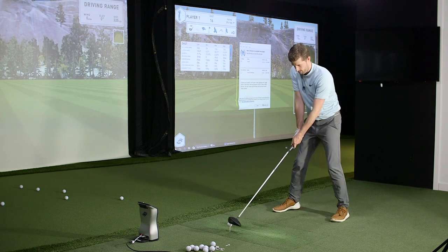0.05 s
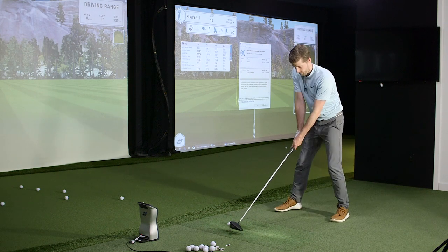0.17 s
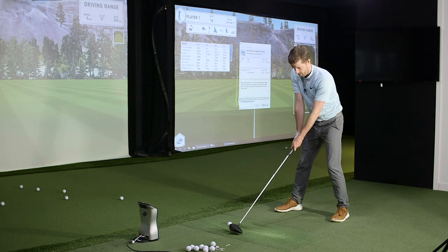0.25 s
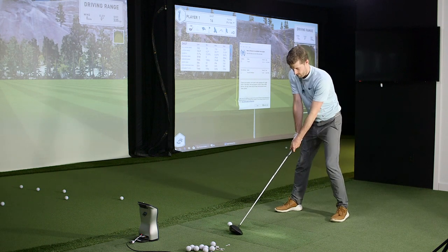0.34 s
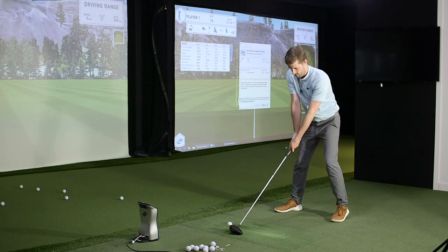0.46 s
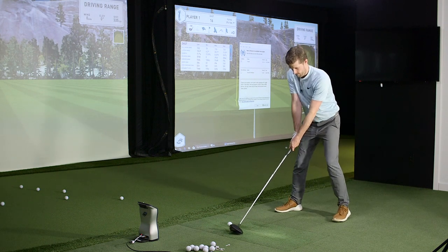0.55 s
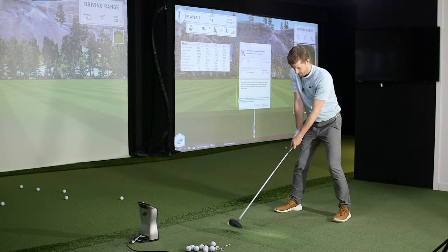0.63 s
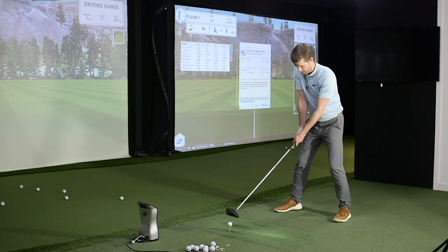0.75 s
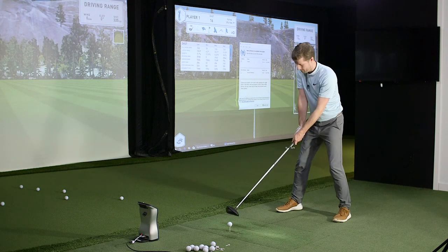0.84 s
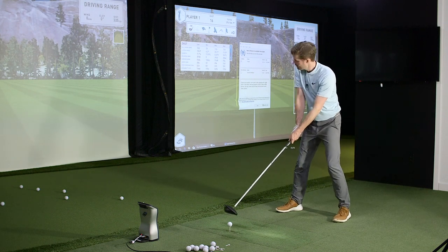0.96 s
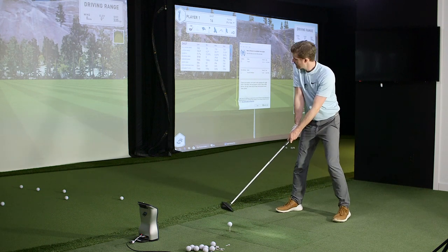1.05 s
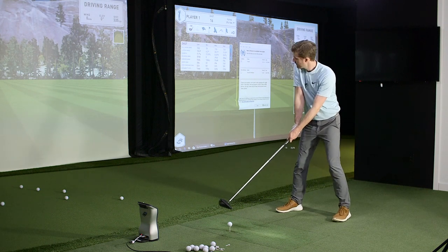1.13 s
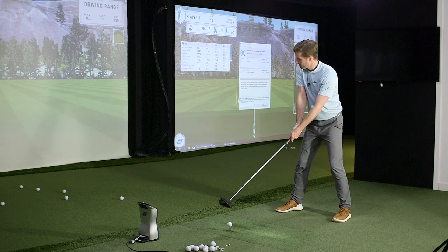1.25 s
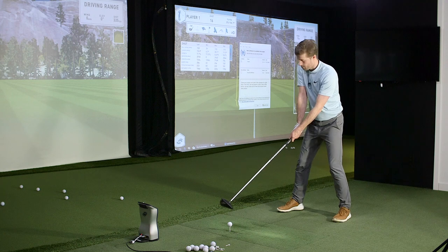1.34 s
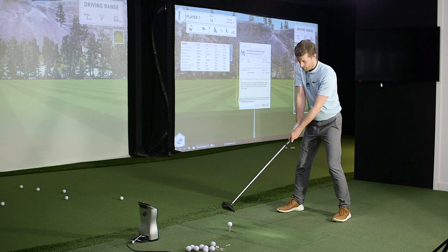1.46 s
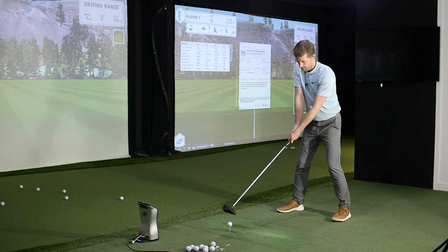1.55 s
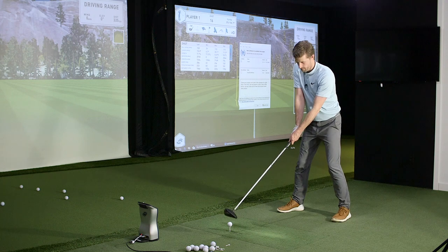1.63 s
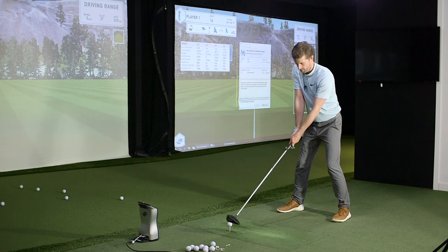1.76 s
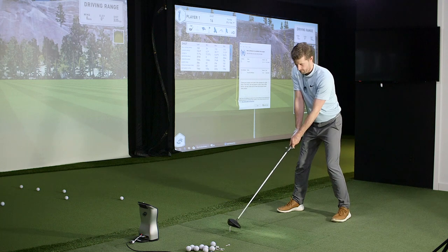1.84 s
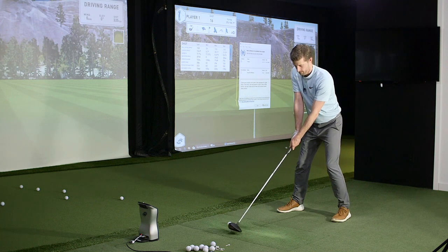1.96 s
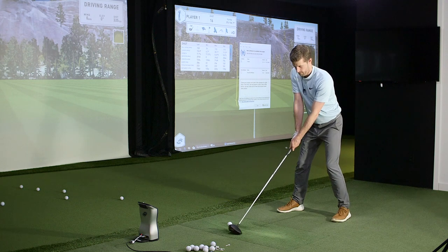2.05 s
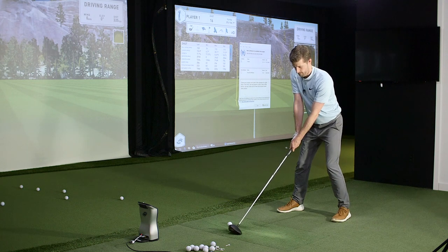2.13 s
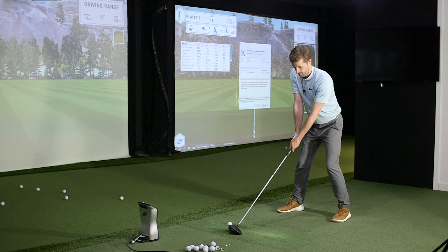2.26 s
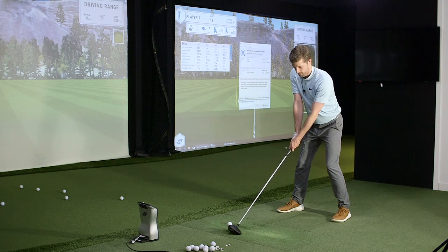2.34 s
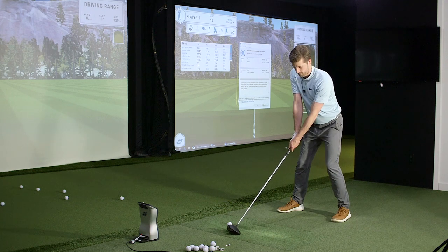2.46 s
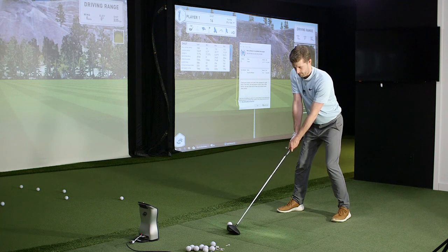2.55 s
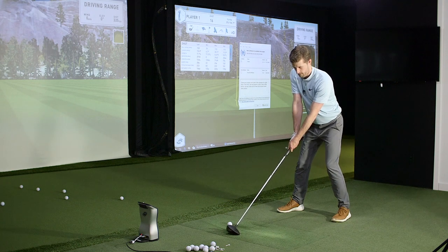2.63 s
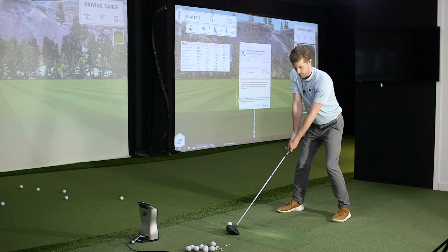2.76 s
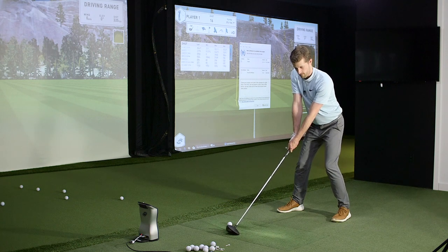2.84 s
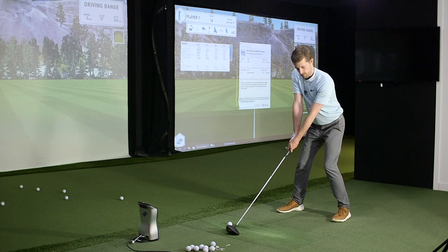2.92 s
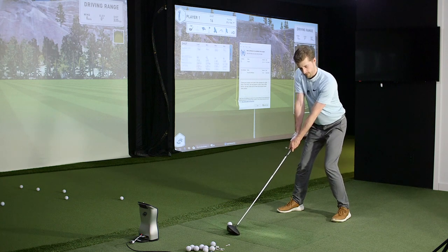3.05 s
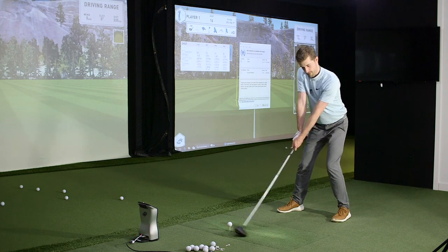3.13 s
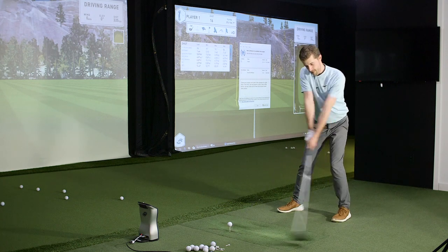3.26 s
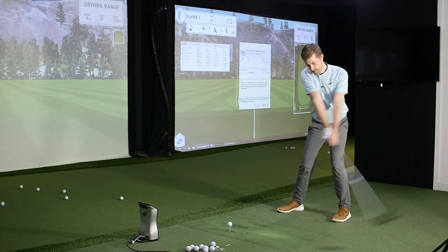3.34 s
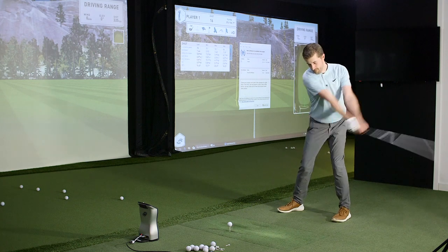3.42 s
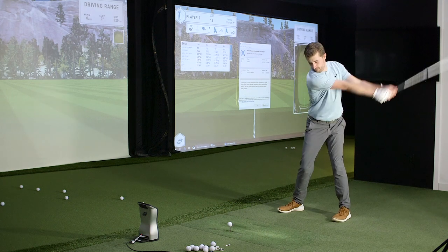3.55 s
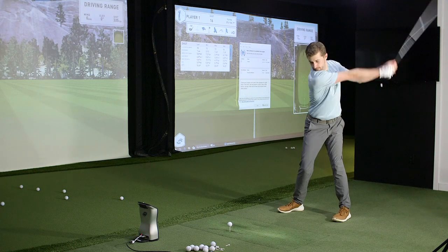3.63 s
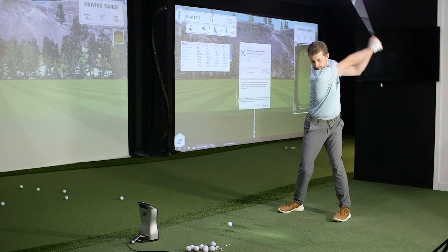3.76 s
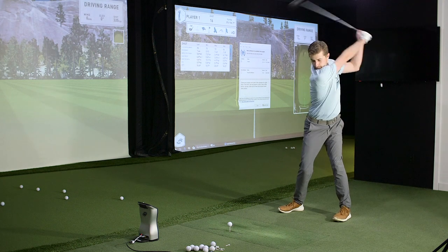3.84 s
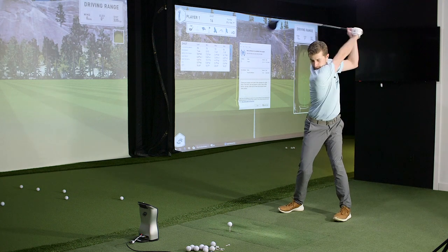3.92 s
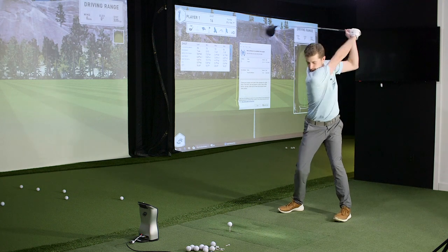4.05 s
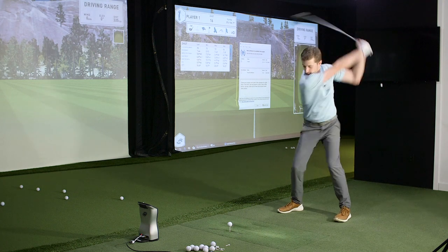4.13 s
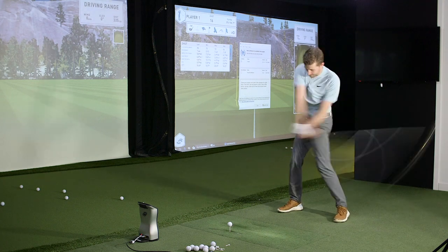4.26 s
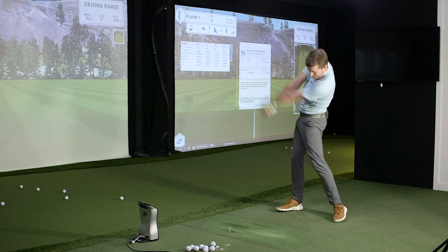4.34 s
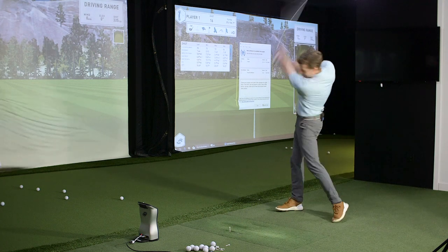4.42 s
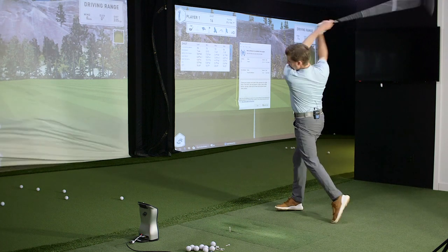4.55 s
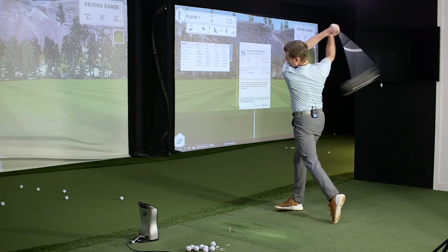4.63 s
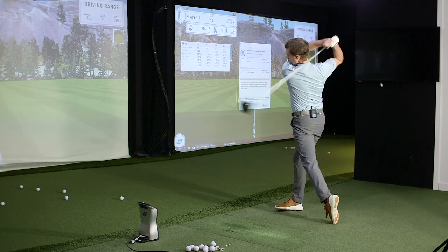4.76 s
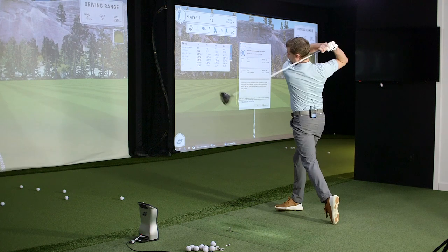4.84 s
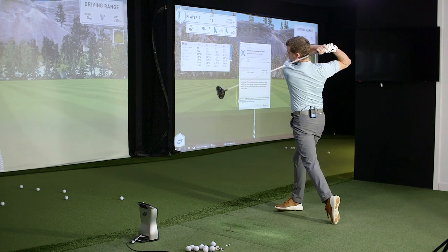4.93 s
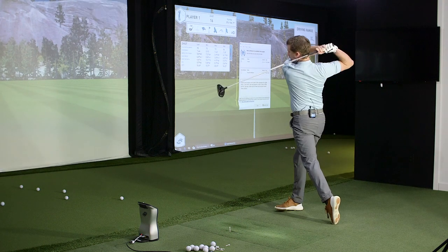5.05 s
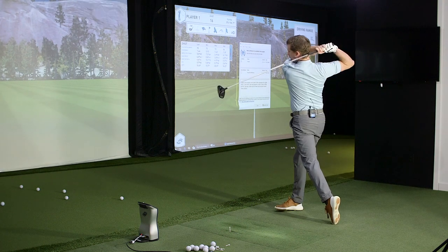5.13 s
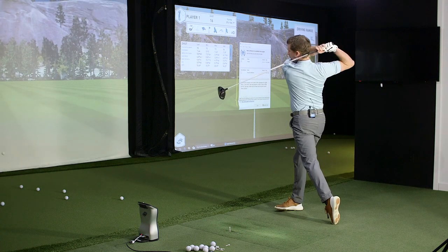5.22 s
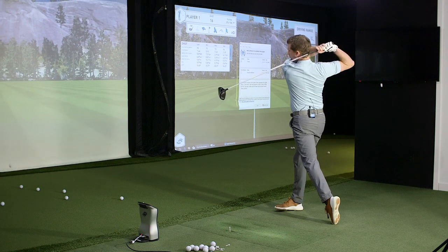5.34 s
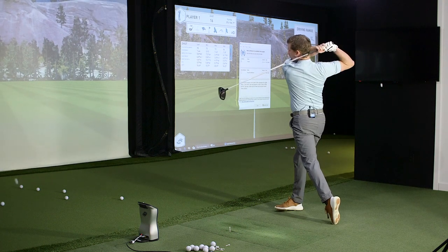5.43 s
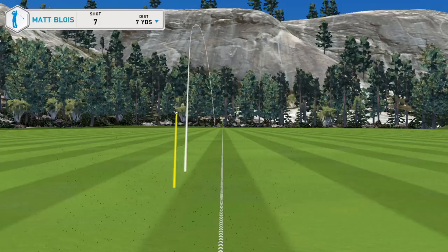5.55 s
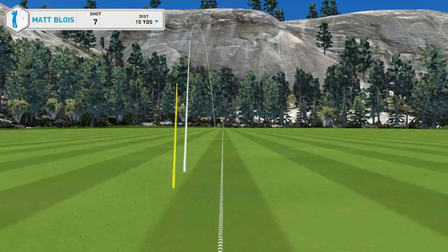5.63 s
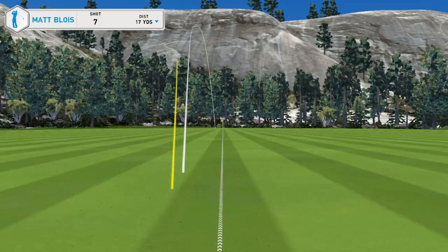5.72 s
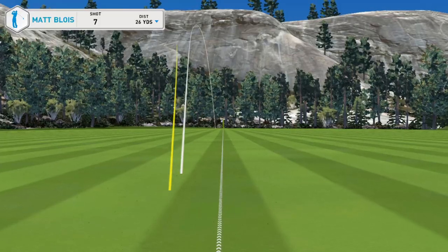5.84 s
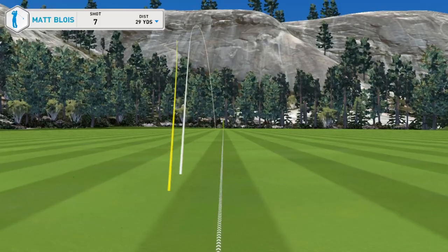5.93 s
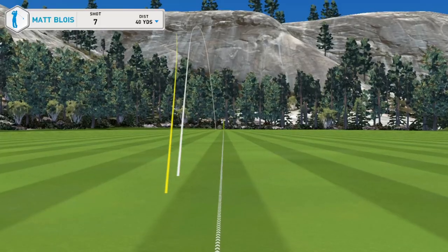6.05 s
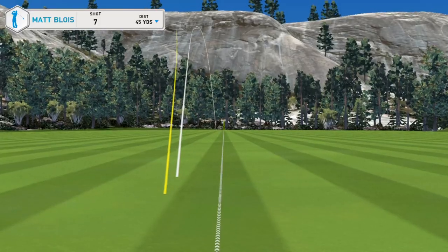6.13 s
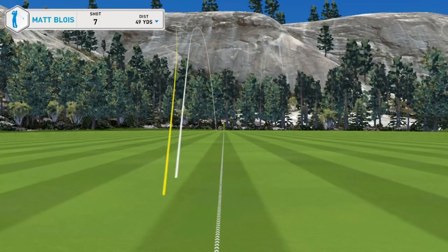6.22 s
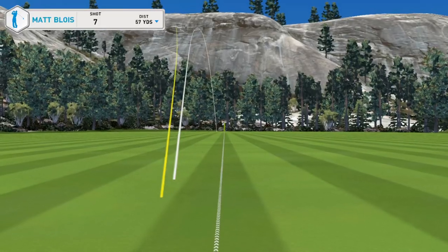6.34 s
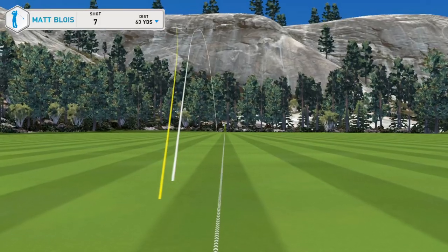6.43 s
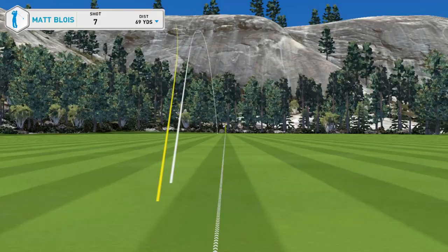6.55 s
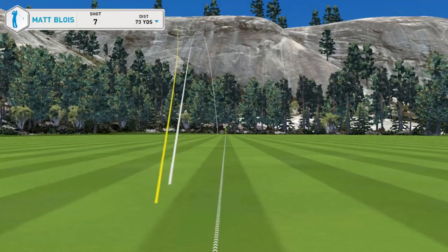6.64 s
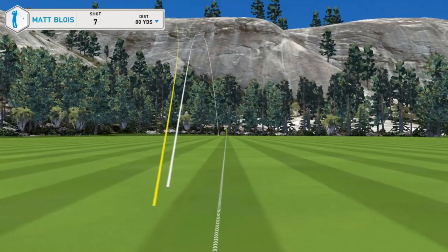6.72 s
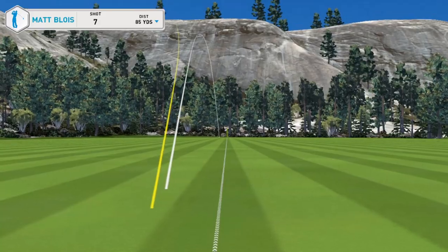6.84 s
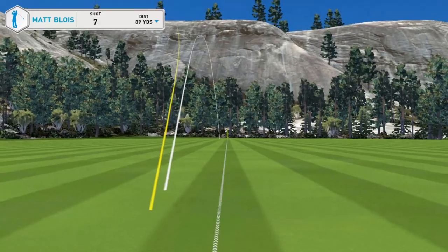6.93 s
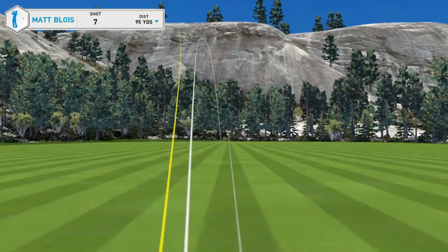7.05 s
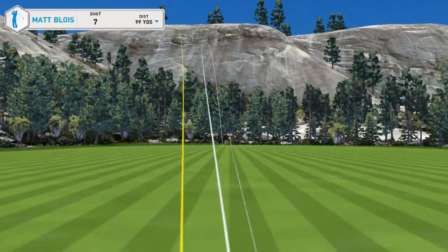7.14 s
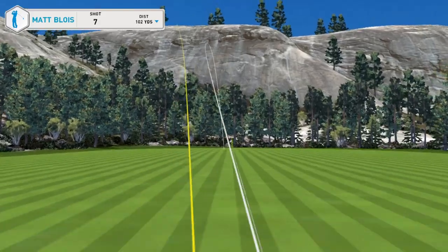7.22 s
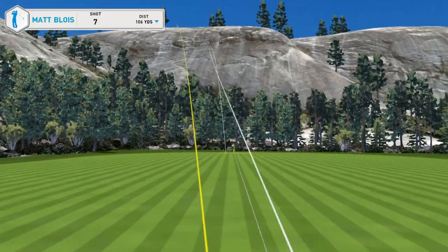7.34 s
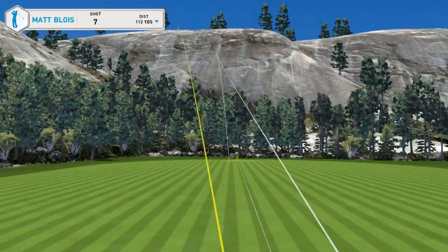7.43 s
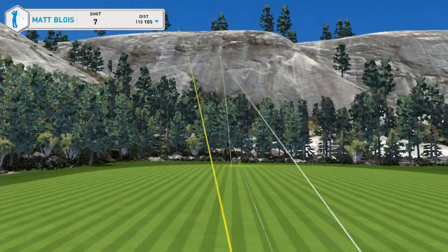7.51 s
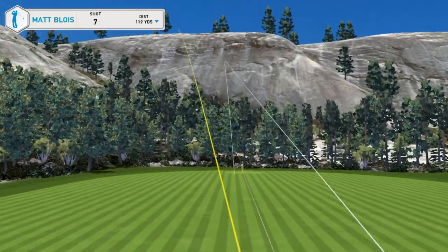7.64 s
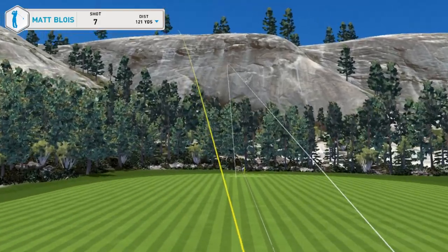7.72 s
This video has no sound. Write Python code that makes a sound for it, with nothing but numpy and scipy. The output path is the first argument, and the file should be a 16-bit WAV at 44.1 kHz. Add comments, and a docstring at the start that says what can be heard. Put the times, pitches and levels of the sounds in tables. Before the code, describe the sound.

Machine hum throbs under soft shuffling; a swift swing whoosh ends in a loud, distorted golf-ball crack, a screen thud and ringing room, then a small close crackle.

```python
"""Golf drive in an indoor bay

One clip-on microphone that overloads; a golfer drives a ball into a hanging screen.
Throughout, two machines hum a few hertz apart as beating sines, over fan tones and duct air of filtered noise.
Cloth and shoes rustle as swelling grains of noise; ticks, a knock and a late crackle sit close to the microphone.
The shaft whooshes as noise in a moving band, and the hollow head cracks the ball as ringing modes.
The ball booms into the screen, and the bay rings out as noise decaying band by band."""
import sys
import numpy as np
from scipy import signal
from scipy.fft import rfft, irfft, next_fast_len
from scipy.io import wavfile

SR = 44100
rng = np.random.default_rng(int(sys.argv[2]) if len(sys.argv) > 2 else 0)


def store_pcm(level_fs):
    """Save levels as 16-bit WAV."""
    pcm = np.round(np.clip(level_fs, -1, 1) * 32767).astype(np.int16)
    wavfile.write(sys.argv[1], SR, np.atleast_2d(pcm).T)


N = 343098
TIME = np.arange(N) / SR

# Levels are those ahead of the microphone input; "relative" ones are scaled where they are used.
# Hum of two motors: [f/Hz, rms level/dB]
MOTOR_HUM = [(53.93, -48), (59.05, -50)]
# Overtones of the hum: [multiple of first motor, multiple of second motor, rms level/dB]
HUM_OVERTONES = [(2, 0, -58), (1, 1, -68.5), (0, 2, -63), (3, 0, -61.5)]
# A fan's blade tone, drifting slightly in pitch: [t/s, f/Hz, rms level/dB]
BLADE_DRIFT = [(0, 522.7, -63), (3.3, 525.3, -64.5), (3.7, 523.7, -58.5), (7.78, 523.4, -61)]
# Wavering fan tones: [f/Hz, bandwidth/Hz, rms level/dB]
WAVERING_TONES = [(108.55, 27, -51.5), (265, 1.3, -64), (537, 3, -67.5), (794, 2.9, -68.5),
                  (1028, 3.5, -71), (1520, 1.4, -72.5)]
# Air of fans and ducts: [f/Hz, relative level/dB per Hz]
DUCT_COLOUR = [(15, -49), (30, -29), (42, -20.5), (59, -22.5), (82, -24.5), (114, -11), (134, -16.5),
               (280, -16.5), (489, -20), (817, -26), (1560, -31.5), (2160, -39.5), (4500, -46), (7000, -52),
               (16000, -54)]

# Separate shirt rustles, rise and fall spanning 20 dB: [peak t/s, peak level/dB, rise/s, fall/s, treble lift/dB]
SHIRT_RUSTLES = [(.02, -72, .1, .2, -1), (.25, -75, .05, .06, 3), (.66, -69, 0.081, .12, -3),
                 (.885, -57.5, 0.083, 0.11, 0.5), (.96, -67, .08, .05, 5), (1.43, -74, .05, .12, 6),
                 (2.99, -75, .06, .15, 4), (3.28, -66, 0.092, .1, 1), (4.17, -79, .03, .04, 2),
                 (4.354, -40.5, .018, .045, -10), (4.84, -58, .07, .06, 0), (5.05, -64, .06, .1, 0),
                 (5.635, -62, .03, .07, -12), (5.98, -75, .04, .05, 0), (7.0, -68, .1, 0.82, 3)]
# Shirt stretching through the backswing: [t/s, level/dB]
SHIRT_STRETCH = [(3.35, -78), (3.55, -65), (3.73, -59), (3.79, -61), (3.84, -66), (4.01, -64), (4.12, -74),
                 (4.28, -69), (4.33, -70)]
# Colour of sliding cloth: [f/Hz, relative level/dB per Hz]
CLOTH_COLOUR = [(1500, -7.5), (2800, -1), (4200, -3.5), (7000, -4.5), (10000, -3.5), (13600, -3),
                (16000, -13)]
# Feet shifting on the turf: [peak t/s, peak level/dB]
SHOE_SCUFFS = [(.07, -57), (.35, -72), (.54, -60), (.8, -59.5), (1.04, -60.5), (1.17, -66), (1.32, -61),
               (1.53, -58.5), (1.63, -63), (1.7, -63), (1.8, -65), (1.92, -73)]
# Colour of shoes on turf: [f/Hz, relative level/dB per Hz]
TURF_COLOUR = [(600, 9.0), (1500, 14.5), (2600, 2), (3600, 1.5), (5000, -11.0), (9000, -66)]
# Small ticks near the microphone: [t/s, peak level/dB, f/Hz, ring/cycles]
CLOSE_TICKS = [(.38, -45, 2000, 2.8), (0.499, -43, 2530, 2.5), (0.81, -29, 11000, 2.6),
               (1.325, -48, 2200, 2.5), (1.535, -42, 1400, 5.3), (1.591, -47, 3000, 2.2),
               (1.65, -52, 1800, 3), (1.758, -50, 10000, 2.5), (1.886, -47, 9000, 1.5),
               (2.26, -52, 11000, 2.5), (3.39, -50, 8500, 4), (3.864, -38, 1216, 1.3),
               (5.627, -47, 3000, 1.9), (6.8375, -34, 11500, 4), (6.856, -25, 9000, 1.8),
               (6.8608, -22, 6500, 1.5), (6.864, -31, 9500, 1.5), (6.8707, -11.5, 8650, 1),
               (6.8712, -7, 11500, 1.5), (6.875, -32, 5000, 1.5), (6.8772, -24, 11500, 1.8),
               (6.899, -29, 4500, 1.5), (6.904, -35, 1500, 1.1)]
# What the knock at the top of the backswing rings with: [f/Hz, level/dB, t60/s]
KNOCK_MODES = [(740, -23, 0.0047), (1150, -28, 0.0062), (2140, -28.5, 0.0062), (4700, -41, 0.0071),
               (14500, -28, 0.0027)]

# Downswing: [t/s, f/Hz of air shed by the shaft, whoosh level/dB, low rush level/dB, hiss level/dB]
DOWNSWING = [(4.25, 300, -79, -52, -90), (4.3, 346, -68, -42.5, -75), (4.36, 423, -58, -33, -62),
             (4.395, 560, -58, -32.5, -64), (4.41, 696, -34, -37, -56.5), (4.43, 850, -24.5, -33, -44),
             (4.45, 1000, -18.5, -27, -36), (4.468, 1103, -28.5, -21.5, -37),
             (4.49, 1107, -33.5, -44.5, -49.5), (4.52, 988.4, -72, -74, -79)]
# Air pushed by the club head: [f/Hz, relative level/dB per Hz]
RUSH_COLOUR = [(20, -11), (50, -6), (110, -4.0), (250, -20), (600, -26.5), (3000, -44.5)]
# Hiss of the club head: [f/Hz, relative level/dB per Hz]
HISS_COLOUR = [(1500, -8), (3000, -2.5), (6000, -5.5), (10000, -1.5), (16000, -3.5)]

# Ball squashed on the face: [f/Hz, relative level/dB per Hz]
CRACK_COLOUR = [(40, -4.5), (100, -7.5), (250, -2.5), (500, 0.5), (800, -0.5), (1300, -6.5), (2000, -5),
                (3000, -12), (4000, -6.5), (5000, -6), (8000, -5), (12000, -6.5), (16000, -12.5)]
# Nearly even blow that sets the head ringing: [f/Hz, relative level/dB per Hz]
BLOW_COLOUR = [(40, 0.00046), (16000, 0.0003)]
# Modes of the hollow club head: [f/Hz, relative level/dB, t60/s]
HEAD_MODES = [(3950, -4, .009), (3997, -0.5, .010), (4420, -4, .006), (5200, -7.5, .005),
              (5750, -2.5, .007), (6280, -2, 0.0087), (6250, -9.5, 0.0033), (8600, -8.5, .003),
              (10000, -9.5, .003)]
# Snap of the strike: [f/Hz, relative level/dB per Hz]
SNAP_COLOUR = [(300, -3.5), (1200, 1), (3000, -10.5), (16000, -23.5)]
# Air of the strike reaching the microphone: [f/Hz, relative level/dB, t60/s]
PUFF_MODES = [(35, -0.5, .1), (72, -3, 0.12), (136, 1, 0.027), (260, -8.5, .02)]
# Modes of the screen and the air behind it: [f/Hz, relative level/dB, t60/s]
SCREEN_MODES = [(106.7, -10.5, .3), (142.5, -13.5, 0.16), (175.7, -9.5, 0.11), (209, -7.5, 0.072),
                (314, -20.5, 0.11), (439, -7.5, 0.092), (584, -15, 0.052)]
# Cloth of the screen whipped back: [f/Hz, relative level/dB per Hz]
SLAP_COLOUR = [(40, -46), (70, -16), (100, 7), (160, 9.5), (210, 1.5), (280, -3.5), (420, -6), (600, -17),
               (900, -22), (1500, -19.5), (4000, -44)]
# Decay of the bay: [f/Hz, t60/s]
BAY_DECAY = [(60, .9), (120, .85), (250, .75), (500, 1.0), (1000, 1.1), (2000, .92), (4000, .88),
             (6000, .72), (8000, .54), (11000, .38), (16000, .26)]

# Short close crackle in four bursts: [peak t/s, peak level/dB, rise/s, fall/s]
CRACKLE_BURSTS = [(6.851, -54, .004, .006), (6.862, -33, 0.0086, 0.008), (6.877, -31.5, 0.01, 0.024),
                  (6.9, -44.5, 0.023, 0.049)]
# Colour of the crackle: [f/Hz, relative level/dB per Hz]
GRIT_COLOUR = [(150, -25), (400, 6.5), (1000, 6), (3800, -9), (5080, 3.5), (6040, -6.5), (11800, 1.5),
               (16000, -3)]

HUM_NULL_S = .13   # the two motors are in opposition here
AIR_DB = -51.5
TREBLE_FROM_HZ = 7000
SWELL_POWER = 1.1   # 1 is a pointed swell, 2 a rounded one
SCUFF_RISE_S, SCUFF_FALL_S = 0.14, .12
KNOCK_S, STRIKE_S, SCREEN_S = 4.0036, 4.4700, 4.5505
PUFF_DELAY_S = 0.0054
WALL_ECHO_S, WALL_ECHO_DB = 0.033, -8   # the snap returns from the far wall
CRACKLE_SPREAD_DB = 5
CUTOFF_HZ = 15750


def amp(db):
    """Turns decibels into gain."""
    return 10 ** (np.asarray(db) / 20)


def rms_one(x):
    """Scales to rms 1."""
    return x / np.sqrt(np.mean(x ** 2) + 1e-20)


def level(rows, column=1):
    """Gain in time from a dB column; silent outside the table."""
    rows = np.array(rows)
    return amp(np.interp(TIME, rows[:, 0], rows[:, column], left=-200, right=-200))


def swells(rows):
    """Gain in time of swells given as (peak s, peak dB, rise s, fall s)."""
    out = np.zeros(N)
    for s, db, rise, fall in rows:
        near = slice(max(0, round((s - 3 * rise) * SR)), round((s + 3 * fall) * SR))
        away = np.abs(TIME[near] - s) / np.where(TIME[near] < s, rise, fall)
        out[near] += amp(db - 20 * away ** SWELL_POWER)
    return out


def at_hz(points, hz):
    """Reads a table on a log-frequency axis."""
    points = np.array(points)
    return np.interp(np.log(hz), np.log(points[:, 0]), points[:, 1])


def coloured(x, spectrum):
    """Filters x by a spectrum in dB per Hz."""
    size = next_fast_len(len(x))
    hz = np.arange(1, size // 2 + 2) * SR / size
    return irfft(rfft(x, size) * amp(at_hz(spectrum, hz)), size)[:len(x)]


def noise(spectrum):
    """Coloured noise of rms 1."""
    return rms_one(coloured(rng.standard_normal(N), spectrum))


def grains(per_s, spread_db, smooth):
    """Random tiny slips of uneven size over a smooth hiss."""
    sizes = amp(spread_db * np.minimum(rng.exponential(1, N), 5)) * rng.choice([-1, 1], N)
    slips = sizes * (rng.random(N) < per_s / SR)
    return rms_one(slips) + smooth * rng.standard_normal(N)


def ring(x, hz, t60):
    """A two-pole resonator: a unit click sets a sine of height 1 ringing."""
    radius = amp(-60 / (t60 * SR))
    turn = 2 * np.pi * hz / SR
    return signal.lfilter([0, np.sin(turn)], [1, -2 * radius * np.cos(turn), radius * radius], x + 1e-18)


def struck(start, modes, contact):
    """A push that peaks after `contact` seconds rings all modes of a body."""
    age = np.maximum(TIME - start, 0) / contact
    push = age * np.exp(-age) / (contact * SR)
    return sum(amp(db) * ring(push, hz, t60) for hz, db, t60 in modes)


def burst(start, spectrum, t60, rise):
    """Coloured noise that starts sharply and dies."""
    age = np.maximum(TIME - start, 0)
    return noise(spectrum) * (1 - np.exp(-age / rise)) * amp(-60 * age / t60)


def hum():
    """Two motors of unlike speed beat about five times a second; a blade tone drifts above them."""
    (hz_a, db_a), (hz_b, db_b) = MOTOR_HUM
    a = 2 * np.pi * hz_a * (TIME - HUM_NULL_S)
    b = 2 * np.pi * hz_b * (TIME - HUM_NULL_S) + np.pi
    out = amp(db_a) * np.sin(a) + amp(db_b) * np.sin(b)
    out += sum(amp(db) * np.cos(m * a + n * b) for m, n, db in HUM_OVERTONES)
    blade_hz = np.interp(TIME, *np.transpose(BLADE_DRIFT)[:2])
    out += level(BLADE_DRIFT, column=2) * np.sin(2 * np.pi * np.cumsum(blade_hz) / SR)
    return np.sqrt(2) * out   # a sine's peak from its rms


def fans_and_ducts():
    """Noise through narrow resonances wavers as fan tones, over broad duct air."""
    white = rng.standard_normal(N)
    out = amp(AIR_DB) * noise(DUCT_COLOUR)
    for hz, width, db in WAVERING_TONES:
        t60 = np.log(1000) / np.pi / width   # a narrower resonance rings longer
        out += amp(db) * rms_one(ring(white, hz, t60))
    return out


def shirt():
    """Cloth slides on the body; each rustle has its own share of treble."""
    cloth = rms_one(coloured(grains(3000, spread_db=1.5, smooth=1.5), CLOTH_COLOUR))
    dull = signal.sosfiltfilt(signal.butter(1, TREBLE_FROM_HZ, fs=SR, output="sos"), cloth)
    dull_gain = swells([row[:4] for row in SHIRT_RUSTLES])
    treble_gain = swells([(s, db + lift_db, rise, fall) for s, db, rise, fall, lift_db in SHIRT_RUSTLES])
    return dull * dull_gain + (cloth - dull) * treble_gain + cloth * level(SHIRT_STRETCH)


def shoes():
    """Soles scrape the turf in many small slips that swell and fade."""
    scrape = rms_one(coloured(grains(400, spread_db=3.0, smooth=0.63), TURF_COLOUR))
    return scrape * swells([(s, db, SCUFF_RISE_S, SCUFF_FALL_S) for s, db in SHOE_SCUFFS])


def ticks():
    """Each close tick is a short sine that swells and dies."""
    out = np.zeros(N)
    for s, db, hz, cycles in CLOSE_TICKS:
        turns = np.arange(1500) * hz / SR
        swell = turns * 5 / cycles   # a tick swells for a fifth of its cycles, then dies
        out[round(s * SR):][:1500] += amp(db) * swell * np.exp(1 - swell) * np.sin(2 * np.pi * turns)
    return out


def knock():
    """One dry knock at the top of the backswing: a very short push on quickly damped modes."""
    return struck(KNOCK_S, KNOCK_MODES, contact=5e-5)


def swing():
    """Vortices leave the shaft at a pitch set by its speed; the head pushes a low rush of air and hisses."""
    rows = np.array(DOWNSWING)
    white, whoosh, state = rng.standard_normal(N), np.zeros(N), np.zeros((2, 2))
    first, last = round(rows[0, 0] * SR), round(rows[-1, 0] * SR)
    for i in range(first, last, 64):   # the band moves every 64 samples
        hz = np.interp(i / SR, rows[:, 0], rows[:, 1])
        band = signal.butter(2, [hz * .85, hz * 1.15], "band", fs=SR, output="sos")
        whoosh[i:i + 64], state = signal.sosfilt(band, white[i:i + 64], zi=state)
        whoosh[i:i + 64] /= np.sqrt(.8 * hz / SR)   # evens out the changing bandwidth
    out = level(DOWNSWING, column=2) * whoosh
    out += level(DOWNSWING, column=3) * noise(RUSH_COLOUR)
    return out + level(DOWNSWING, column=4) * noise(HISS_COLOUR)


def room(start, spectrum, build, early_db, early_t60):
    """The bay answers a coloured click: echoes pile up, near walls die first, each third-octave at its rate."""
    age, tail = TIME[:int(1.6 * SR)], 0
    edges = 30 * 2 ** np.arange(0, 9.3, 1 / 3)
    white = rng.standard_normal((2, len(age)))
    for k, (low, high) in enumerate(zip(edges, edges[1:])):
        # neighbouring bands take different noise
        band = signal.sosfilt(signal.butter(2, [low, high], "band", fs=SR, output="sos"), white[k % 2])
        hz = np.sqrt(low * high)
        tail = tail + band * amp(at_hz(spectrum, hz) - 60 * age / at_hz(BAY_DECAY, hz))
    early = amp(early_db - 60 * age / early_t60)
    tail = tail * (1 - np.exp(-age / build)) * (1 + early)
    return np.r_[np.zeros(round(start * SR)), tail, np.zeros(N)][:N]


def crack():
    """The ball squashes on the face, heard through the bay's answer."""
    return amp(-0.5) * room(STRIKE_S, CRACK_COLOUR, build=0.0036, early_db=3.5, early_t60=0.13)


def club_head():
    """The hollow head's modes ring, driven by the bay's answer to a nearly even blow."""
    blow = amp(-27.5) * room(STRIKE_S, BLOW_COLOUR, build=PUFF_DELAY_S, early_db=10, early_t60=0.18)
    head = sum(amp(db) * ring(blow, hz, t60) for hz, db, t60 in HEAD_MODES)
    # the small shell radiates little below its first mode
    return signal.sosfilt(signal.butter(4, 3500, "high", fs=SR, output="sos"), head)


def snap():
    """A direct burst of noise from the strike, returned once by the far wall."""
    direct = amp(3.0) * burst(STRIKE_S, SNAP_COLOUR, t60=0.012, rise=.0003)
    return direct + amp(WALL_ECHO_DB) * np.roll(direct, round(WALL_ECHO_S * SR))


def puff():
    """Air from the strike reaches the microphone as a few low damped modes."""
    return amp(-4.5) * struck(STRIKE_S + PUFF_DELAY_S, PUFF_MODES, contact=0.00029)


def screen():
    """The ball rings the screen and the air behind it; the cloth's slap is answered by the bay."""
    boom = amp(10.0) * struck(SCREEN_S, SCREEN_MODES, contact=1e-4)
    slap = amp(8.5) * room(SCREEN_S, SLAP_COLOUR, build=0.00077, early_db=11, early_t60=0.086)
    return boom + slap


def crackle():
    """Dense uneven grains swell in four short bursts close by."""
    grit = rms_one(coloured(grains(2400, spread_db=CRACKLE_SPREAD_DB, smooth=2.3), GRIT_COLOUR))
    return grit * swells(CRACKLE_BURSTS)


def scene():
    """Everything meets at one microphone."""
    machines = hum() + fans_and_ducts()
    golfer = shirt() + shoes() + ticks() + knock() + crackle()
    shot = crack() + club_head() + snap() + puff() + screen()
    return (machines + golfer + swing() + shot)[None]


def record(dry):
    """The microphone input overloads almost squarely, and the top is cut."""
    clipped = 1.04 * dry / (1 + np.abs(dry) ** 10) ** .1
    top_cut = signal.ellip(12, .5, 55, CUTOFF_HZ, fs=SR, output="sos")
    return np.clip(signal.sosfilt(top_cut, clipped), -1, 1)


dry = scene()
out = record(dry)
store_pcm(out)
```